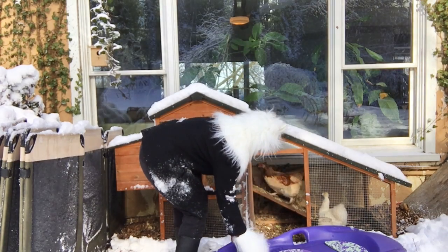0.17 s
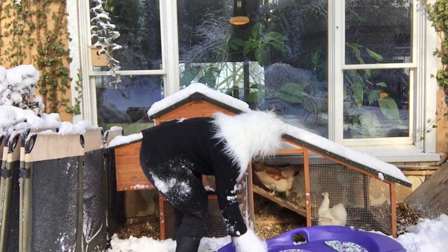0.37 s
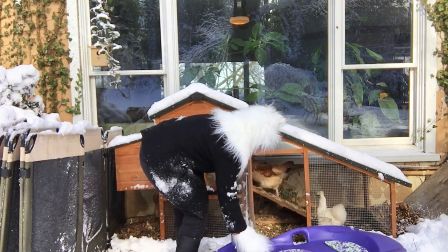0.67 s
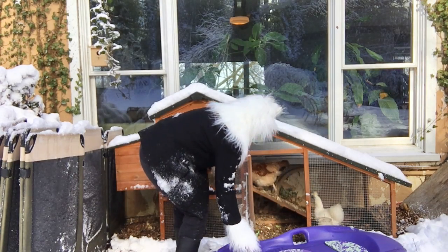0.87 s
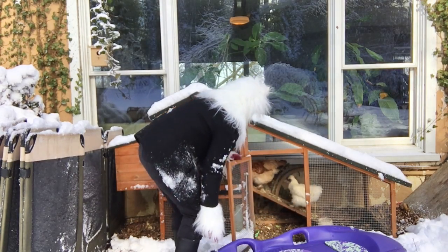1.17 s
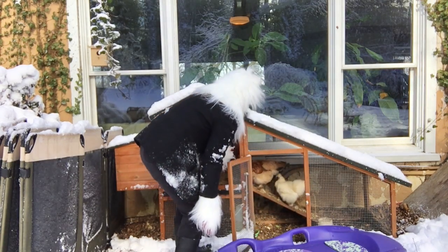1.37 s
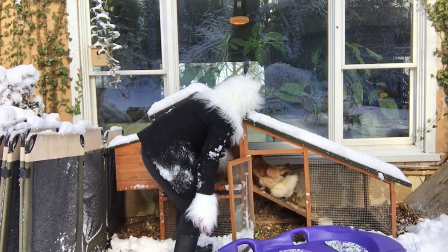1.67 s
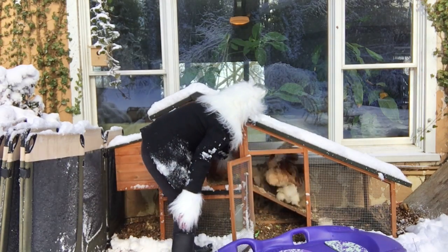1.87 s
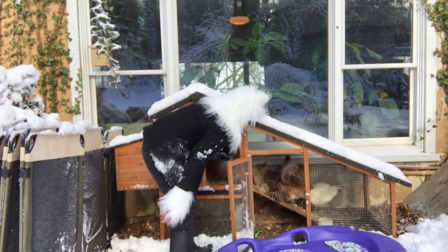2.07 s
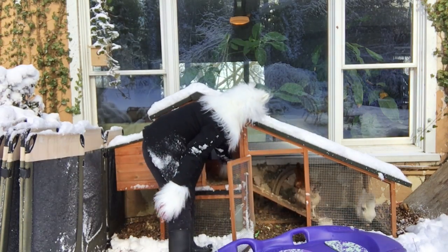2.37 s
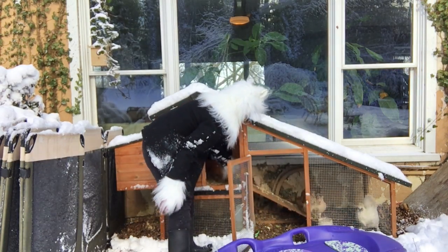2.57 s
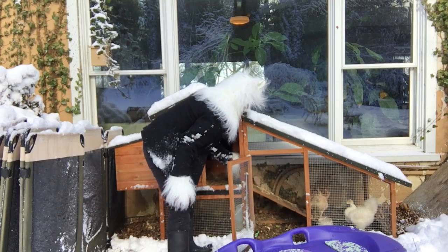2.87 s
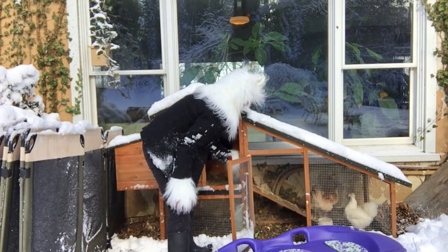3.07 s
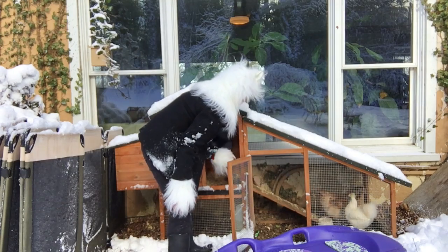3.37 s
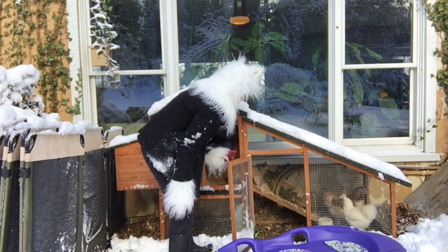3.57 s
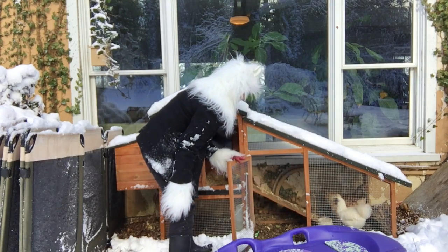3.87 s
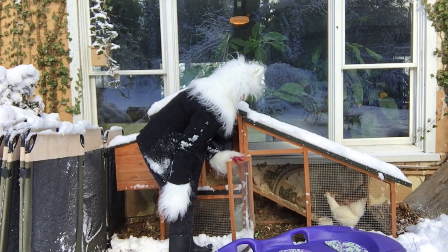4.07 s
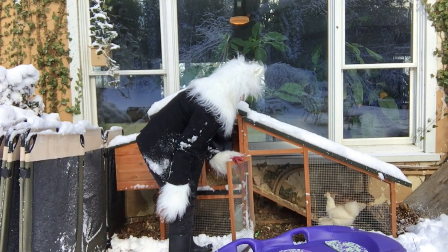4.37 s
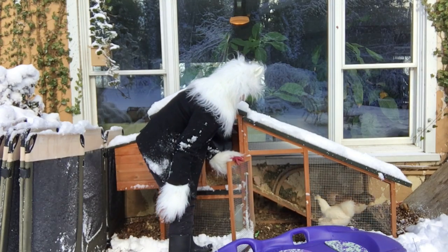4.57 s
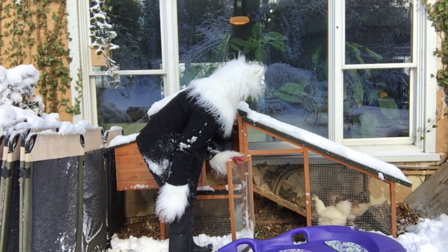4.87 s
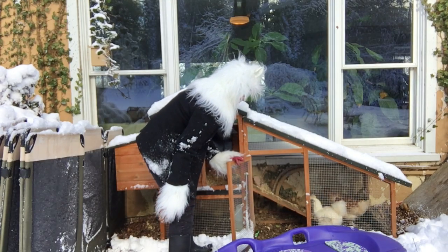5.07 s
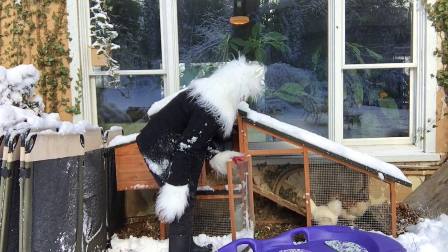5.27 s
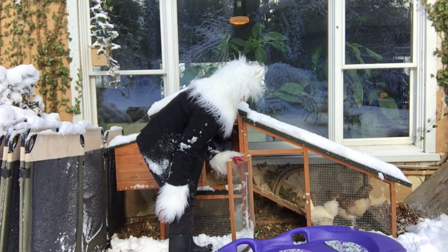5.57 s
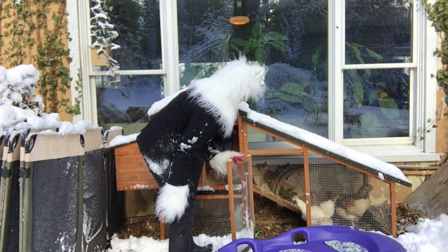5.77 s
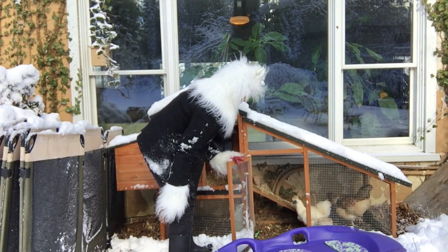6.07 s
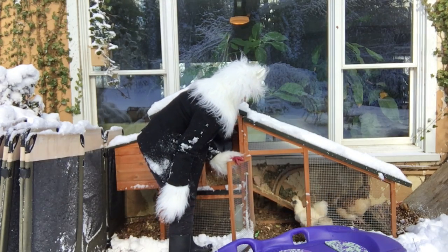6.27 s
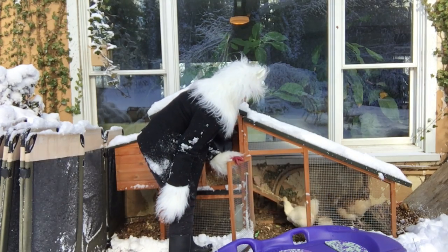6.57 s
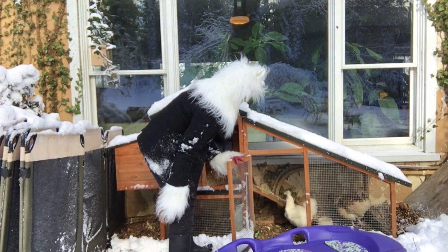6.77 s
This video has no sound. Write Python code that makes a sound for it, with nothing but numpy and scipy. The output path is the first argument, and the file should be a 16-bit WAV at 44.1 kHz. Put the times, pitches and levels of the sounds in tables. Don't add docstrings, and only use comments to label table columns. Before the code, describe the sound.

A winter yard beside a wooden hen coop, heard from nearby, with slow low wind pushes on the microphone and faint hiss. From 0 to 0.7 s, five hollow mitten knocks on a plastic sled, the first strongest, come with latch clicks and rustle; a sharp click lands near 0.6. A low cluck at 0.95 and a hoarse murmur at 1.0-1.4 follow, with a thin peep. Short clucks at 1.5-1.75, bright latch clicks at 1.78, then a very brief shrill squawk cracks between pitches at 1.95-2.1, with light bumps and straw crackle. Clucks at 2.75 and 2.95; wind swells near 2.8 and 3.95. Two small clucks at 3.9, then near quiet. From 5 s come soft clucks and faint peeps; a hoarse drone swells from 5.2 to 6.6, quick chatter peaks around 5.6-6.2, and a lower, fluttering, wheezy growl joins at 6.13, stopping near 6.62. Only wind remains.

```python
import sys
import numpy as np
from scipy import signal
from scipy.fft import rfft, irfft, next_fast_len
from scipy.io import wavfile
from scipy.ndimage import uniform_filter1d, map_coordinates

SR = 44100
rng = np.random.default_rng(int(sys.argv[2]) if len(sys.argv) > 2 else 0)


def int16_out(signal):
    q = np.round(np.clip(np.atleast_2d(signal).T, -1, 1) * 32767)
    wavfile.write(sys.argv[1], SR, q.astype(np.int16))


def convert_level_to_amplitude(level_db):
    exponent = np.asarray(level_db, float) / 20
    return 10 ** exponent


N = 305195


def unit(x):
    return x / np.sqrt(np.mean(x ** 2) + 1e-20)


def along(points, hz):
    f, db = np.transpose(points)
    return np.interp(np.log(hz + 0.1), np.log(f + 0.064), db)


def curves(rows, n):
    s, *columns = np.transpose(rows)
    return [np.interp(n / SR, s, column) for column in columns]


def span(rows):
    return np.arange(round(rows[0][0] * SR), min(N, round(rows[-1][0] * SR)))


def wobble(count, rate):
    knots = rng.standard_normal(4000)
    return map_coordinates(knots, [np.arange(count) * rate / SR], mode="wrap")


def tone_phase(hz):
    return 2 * np.pi * np.cumsum(hz) / SR


def coloured(x, points, ratio=1):
    m = next_fast_len(len(x) + 4096)
    gain = convert_level_to_amplitude(along(points, np.fft.rfftfreq(m, 1 / SR) / ratio))
    cepstrum = irfft(np.log(gain + 1e-6), m)
    cepstrum[1:m // 2] *= 2
    cepstrum[m // 2 + 1:] = 0
    return irfft(rfft(x, m) * np.exp(rfft(cepstrum)), m)[:len(x)]


def noise(count, points):
    return unit(coloured(rng.standard_normal(count), points))


def breathy(pitch_hz, width_hz):
    count = len(pitch_hz)
    spread = wobble(count, width_hz) + 0.8 * wobble(count, 4 * width_hz)
    return spread * np.sin(tone_phase(pitch_hz))


def swell(t, s, hold, db, rise, fall):
    return convert_level_to_amplitude(db - rise * np.clip(s - t, 0, None) - fall * np.clip(t - s - hold, 0, None))


def add(track, s, sound):
    part = track[round(s * SR):][:len(sound)]
    part += sound[:len(part)]


# [t/s, level/dB]
WIND_STRENGTH = [(0, -47), (.1, -59.5), (.8, -64.5), (1.2, -45), (1.75, -52), (2.1, -48), (2.4, -42),
                 (2.68, -36.5), (2.83, -36), (3.0, -49), (3.66, -50), (3.95, -34.5), (4.15, -53),
                 (4.4, -40.5), (4.95, -50.5), (5.2, -45), (5.75, -70), (6.92, -42)]
# [f/Hz, level/dB]
PUSH_COLOUR = [(1, -11), (3, -0.5), (8, -0.5), (16, -22.5), (24, -59.5), (40, -120)]
BUFFET_COLOUR = [(8, -120), (16, 4), (28, 1.5), (45, -11.5), (70, -15.5), (120, -46), (200, -79.5)]
YARD_COLOUR = [(35, -26), (60, -12.5), (170, -16.5), (450, -20.5), (620, -21.5), (1000, -25.5), (1400, -31),
               (3500, -43.5), (7000, -47), (8300, -43), (9500, -50), (15000, -49.5), (16500, -63.5)]


def weather():
    strength_db = curves(WIND_STRENGTH, np.arange(N))[0]
    swing_db = strength_db - strength_db.mean()
    fade_out = np.clip((N - np.arange(N)) / (SR / 8), 0, 1)
    push = fade_out * convert_level_to_amplitude(-28.5 + 0.58 * swing_db) * noise(N, PUSH_COLOUR)
    buffet = convert_level_to_amplitude(strength_db + 2 + 2.6 * wobble(N, 15.0)) * noise(N, BUFFET_COLOUR)
    flurry = swell(np.arange(N) / SR, s=1.967, hold=0, db=-46, rise=88, fall=22)
    yard = np.hypot(convert_level_to_amplitude(-57.5), flurry) * convert_level_to_amplitude(0.75 * wobble(N, 13.0)) * noise(N, YARD_COLOUR)
    return push + buffet + yard


# [t/s, hold/s, level/dB, dull share level/dB]
MOVES = [(0, 0.056, -61, -3), (0.036, 2.84, -71, 1.5), (0.101, 0.09, -57.5, 5), (0.19, 0.021, -53.5, -15),
         (0.31, .005, -64, -5), (0.596, 0.074, -44, 8.5), (0.689, 0.056, -54, 11), (0.748, 0.027, -60, -5),
         (1.184, 0.26, -63, 0), (1.396, 0.18, -61, 7), (1.435, 0.0067, -58.5, -6), (1.5, .006, -60, 0),
         (1.534, 0.014, -60, 4), (1.712, 0.082, -59, -3), (1.751, .012, -50.5, -5),
         (1.798, 0.012, -42.5, 14), (1.94, 0.6, -58.5, 1), (2.171, 0.011, -46.5, -5),
         (2.196, 0.012, -48, -7), (2.237, .01, -51.5, -7), (2.254, .015, -55, 15), (2.286, .015, -52, -5),
         (2.328, .01, -54, -9), (2.403, .006, -52, -5), (2.43, .004, -49, 0), (2.43, 0.0073, -40.5, 3),
         (2.503, .004, -60, -9), (2.751, 0.015, -60.5, -11), (2.798, .018, -58.5, -7),
         (2.828, .012, -70, -4), (3.03, .012, -61, 15), (3.051, 0.0092, -72, 0), (3.18, 0.0057, -68, 0),
         (3.196, .008, -61, -5), (3.215, .01, -60.5, -8), (3.229, 0.013, -59, -2), (3.303, .006, -65, 18),
         (3.326, 0.009, -67.5, -8), (3.506, 0.0035, -70, -5), (3.553, .004, -67.5, -5)]
# [f/Hz, level/dB]
STRAW_COLOUR = [(180, -28.5), (300, 0.5), (456, -19), (1430, -3), (1600, -1), (3140, -7), (5830, -11),
                (13000, -20.5), (15700, -20.5), (16500, -52)]
WOOD_COLOUR = [(300, -30.5), (700, -3.5), (1200, -0.5), (1800, -5), (2500, -7.5), (3300, -15.5),
               (5000, -45.5)]


def rustle():
    t = np.arange(N) / SR
    moves = [swell(t, s, hold, db, rise=880, fall=710) for s, hold, db, _ in MOVES]
    crisp = np.sqrt(sum(move ** 2 for move in moves))
    dull = np.sqrt(sum((move * convert_level_to_amplitude(row[-1])) ** 2 for move, row in zip(moves, MOVES)))
    grains = rng.standard_normal(N) * convert_level_to_amplitude(2.7 * wobble(N, 330) + 1.3 * wobble(N, 45))
    straw = crisp * unit(coloured(grains, STRAW_COLOUR))
    return straw + convert_level_to_amplitude(-10.5) * dull * unit(coloured(grains, WOOD_COLOUR, 0.64))


# [t/s, peak level/dB, woody part level/dB, t60/s]
LATCH_CLICKS = [(0.0074, -37, 11.5, 0.13), (0.103, -41, 9.5, 0.052), (0.1433, -20, -9, 0.081),
                (0.1922, -30.5, 12.5, 0.03), (0.3598, -40.5, 10, 0.097), (0.524, -48, 4, 0.025),
                (0.5476, -39.5, 3, .03), (0.5528, -30.5, 6.5, 0.016), (0.5923, -12.5, -6.5, 0.042),
                (0.6405, -28, 6.5, 0.1), (0.694, -32, -6, 0.11), (1.0208, -46, 16.5, 0.065),
                (1.106, -47.5, 4, 0.11), (1.191, -34.5, -4, 0.065), (1.29, -46, 3, 0.092),
                (1.456, -58, -25, 0.025), (1.5901, -36.5, 1.5, 0.12), (1.768, -40.5, 12, 0.057),
                (1.7757, -22, -7, 0.25), (1.7787, -12.5, -3.5, 0.14), (1.8015, -27, -9, .05),
                (1.7934, -24, 4, 0.074), (1.814, -31, -1, 0.034), (1.8911, -21.5, -3, 0.13),
                (1.93, -46.5, 23, 0.015), (2.105, -23, -3, 0.058), (2.114, -22, 2, 0.12),
                (2.3535, -25.5, 8.5, 0.11), (2.4666, -31.5, 2.5, 0.13), (2.993, -45.5, 18.5, 0.082),
                (3.018, -56, 17, 0.22), (3.085, -51.5, 6, 0.045), (3.8655, -59, 8, 0.031),
                (4.6835, -63.5, 0.5, 0.039)]
# [f/Hz, level/dB]
WIRE_COLOUR = [(1470, -34.5), (2500, 4.5), (2750, -3), (6600, -7.5), (7490, -5), (10000, -16.5),
               (13200, -15), (15700, -22.5), (16500, -37)]
EDGE_COLOUR = [(3000, -45), (6500, -9), (8200, 9.5), (10000, -5.5), (13000, -0.5), (16500, -25.5)]


def clicks():
    track, t = np.zeros(N), np.arange(SR // 8) / SR
    for s, db, wood_db, life in LATCH_CLICKS:
        tick = convert_level_to_amplitude(-60 * t / 0.023)
        ring = convert_level_to_amplitude(-9.5 - 60 * t / max(life, 0.005))
        fall = (tick + ring) * (1 - np.exp(-t / 0.0003))
        body = noise(len(t), WIRE_COLOUR) + convert_level_to_amplitude(wood_db) * noise(len(t), WOOD_COLOUR)
        edge = convert_level_to_amplitude(-1.5 - wood_db - 60 * t / 0.0095) * noise(len(t), EDGE_COLOUR)
        add(track, s, convert_level_to_amplitude(db - 9.0) * (fall * body + edge))
    return track


# [t/s, peak level/dB, slap level/dB, pitch ratio]
BLOWS = [
    (.007, -9.5, -9.5, 1.14),
    (0.19, -12, -11.5, 1.01),
    (0.359, -18, -7, 0.9),
    (0.548, -17.5, -7, 0.99),
    (0.708, -20.5, -8, 1.07),
    (1.203, -36, -3.5, 1.6),
    (1.811, -35.5, 3.5, 1.7),
    (2.09, -31.5, 5, 1.2),
    (2.114, -28.5, -0.5, 2.2),
]
# [f/Hz, level/dB, t60/s]
SHELL_MODES = [(93, -11.5, 0.18), (132, -7, 0.14), (170.6, -3, 0.12), (204.8, -8, 0.12), (274, -9.5, 0.07),
               (378, -9, 0.09), (600, -22.5, 0.088), (780, -21.5, 0.09), (920, -16, 0.066),
               (1238, -28, 0.073), (1610, -31, 0.089)]


def knocks():
    track, t = np.zeros(N), np.arange(SR // 4) / SR
    slap_colour = [(150, -3.5), (300, -1.5), (600, -3), (1400, -12.5), (2200, -33.0), (5000, -43.0)]
    for s, db, slap_db, ratio in BLOWS:
        ring = np.zeros(len(t))
        for k, (hz, level, life) in enumerate(SHELL_MODES):
            fall = convert_level_to_amplitude(level + 1.5 * rng.normal() - 60 * t / life)
            ring += (-1) ** k * fall * np.sin(2 * np.pi * hz * ratio * t)
        bloom = convert_level_to_amplitude(1.0) * (1 - np.exp(-t / 0.015))
        slap = convert_level_to_amplitude(slap_db - 1.0 - 60 * t / 0.11) * noise(len(t), slap_colour)
        add(track, s, convert_level_to_amplitude(db) * (1 - np.exp(-t / 0.0013)) * (bloom * ring + slap))
    return track


# [t/s, length/s, f/Hz, level/dB, octave level/dB]
PULLET_PEEPS = [
    (1.247, 0.072, 2790, -65, -14),
    (1.332, 0.066, 3800, -86, -20),
    (5.112, 0.025, 3200, -77, -24),
    (5.497, 0.088, 3370, -70, -1),
    (5.545, 0.068, 2740, -68, 1),
    (5.74, 0.074, 2810, -70, 5.5),
    (5.82, .06, 2850, -81.5, 1),
]


def peeps():
    track = np.zeros(N)
    for s, length, start_hz, db, octave_db in PULLET_PEEPS:
        u = np.linspace(0, 1, round(length * SR))
        pitch_hz = start_hz * (1 + 0.018 * u)
        whistle = breathy(pitch_hz, 113.0) + convert_level_to_amplitude(octave_db) * breathy(2 * pitch_hz, 322)
        add(track, s, convert_level_to_amplitude(db) * np.sin(np.pi * u) ** 0.2 * whistle)
    return track


def syrinx(pitch_hz, rough, throat, ratio, halves=0):
    count = len(pitch_hz)
    phase = tone_phase(pitch_hz * (1 + (0.013 + 0.0373 * rough) * wobble(count, 260)))
    puffs = sum(np.cos(k * phase) for k in range(1, 26))
    puffs = puffs * (1 + halves * np.cos(phase / 2))
    air = (1 + np.cos(phase)) ** 2 * rng.standard_normal(count)
    share = np.clip(rough, 0, 1) ** 2
    source = np.sqrt(1 - share) * unit(puffs) + np.sqrt(share) * unit(air)
    return unit(coloured(source, throat, ratio))


# [f/Hz, level/dB]
HEN_THROAT = [(250, -22.5), (550, -5.5), (800, -3), (1060, 5.5), (1300, -13), (1500, -18), (1800, -18),
              (2250, -42), (2800, -26), (3300, -33.5), (3650, -25.5), (4150, -36.5), (4600, -49),
              (8000, -43.5), (8700, -34), (10000, -97.5)]
# [t/s, length/s, f/Hz, level/dB, throat ratio]
STARTLED = [
    (0.945, 0.065, 414.6, -51.5, 1.05),
    (1.529, 0.038, 364.5, -44.5, 1.26),
    (1.697, 0.029, 381.5, -42.5, 0.95),
    (1.748, 0.024, 810, -56, 2.3),
    (2.742, 0.0253, 335.4, -41, 1.09),
    (2.947, 0.0273, 364.6, -39, 1.08),
    (3.862, 0.02, 346, -48, 1.065),
    (4.975, 0.057, 292, -48, 1.08),
    (5.114, 0.066, 345, -49.5, .9),
]
CHATTERING = [
    (3.914, 0.037, 425, -46.5, 0.93),
    (5.279, 0.038, 421, -46, 0.84),
    (5.62, 0.037, 416.6, -39.5, 1.03),
    (5.701, 0.05, 413, -37.5, 1.02),
    (5.787, 0.012, 401, -43, 0.89),
    (5.816, 0.029, 411, -41, 1.01),
    (5.962, 0.036, 433.5, -36.5, 1.07),
    (6.025, 0.024, 433, -40.5, 1.1),
    (6.057, 0.093, 445, -39, 1.08),
    (6.189, 0.03, 340, -36.5, 0.89),
]
STARTLED_GLIDES = [0.022, 0.083, -0.13, .05, -0.14, 0.26, 0.047, 0.054, -0.048]


def clucks():
    track = np.zeros(N)
    open_throat = [(hz, 0.77 * db if hz < 2500 else db) for hz, db in HEN_THROAT]
    startled = (STARTLED, STARTLED_GLIDES, 0.52, open_throat)
    chatter = (CHATTERING, np.zeros(len(CHATTERING)), 0.36, HEN_THROAT)
    for rows, glides, rough, throat in (startled, chatter):
        for (s, length, pitch_hz, db, ratio), glide in zip(rows, glides):
            u = np.linspace(0, 1, round(length * SR))
            arch_hz = pitch_hz * (1 + 0.05 * (np.sin(2.9 * u) - 0.7) + glide * (u - 0.5))
            shifted = sorted((hz * ratio if hz < 2000 else hz, level) for hz, level in throat)
            hum = convert_level_to_amplitude(-9) * np.sin(tone_phase(arch_hz))
            voice = syrinx(arch_hz, rough, shifted, 0.99) + hum
            shape = np.clip(u / 0.12, 0, 1) * np.clip((1 - u) / 0.25, 0, 1)
            rattle = convert_level_to_amplitude(2.5 * wobble(len(u), 152))
            add(track, s, convert_level_to_amplitude(db) * shape * rattle * voice)
    return track


def between_clucks(depth_db):
    t = np.arange(N) / SR
    busy = sum((t > s) * (t < s + length) * 1. for s, length, *_ in CHATTERING)
    return convert_level_to_amplitude(depth_db * uniform_filter1d(busy, size=300))


def call(rows, manner, throat, ratio, depth_db, halves=0):
    n = span(rows)
    count = len(n)
    pitch_hz, level_db, hum_db = curves(rows, n)
    rough, rough_end, first, last, uneven = manner
    flutter = np.sin(tone_phase(np.linspace(first, last, count) * (1 + uneven * wobble(count, 29.3))))
    voice = syrinx(pitch_hz, np.linspace(rough, rough_end, count), throat, ratio, halves)
    voice = unit(voice * convert_level_to_amplitude(depth_db * np.minimum(flutter, 0.4) + 0.94 * wobble(count, 32.8)))
    hum = np.sin(tone_phase(pitch_hz + 6 * wobble(count, 41.8)))
    track = np.zeros(N)
    track[n] = convert_level_to_amplitude(level_db) * (voice + convert_level_to_amplitude(hum_db) * hum) * signal.windows.tukey(count, 600 / count)
    return track


# [t/s, f/Hz, level/dB, hum level/dB]
MURMUR_PATH = [
    (1.0, 405, -54, -30),
    (1.2, 401, -56, -30),
    (1.32, 414, -47, -29),
    (1.44, 399, -56.5, -35),
]
# [roughness at start, at end, flutter f/Hz at start, at end, unevenness 0-1]
MURMUR_MANNER = (.88, .88, 40, 41, .3)
# [f/Hz, level/dB]
MURMUR_THROAT = [(250, -20), (550, 4), (800, 3.5), (1100, -0.5), (1500, -14.5), (2000, -15), (2750, -22),
                 (3300, -35), (5000, -56)]


def murmur():
    return call(MURMUR_PATH, MURMUR_MANNER, MURMUR_THROAT, 1, 4)


# [t/s, f/Hz, level/dB, hum level/dB]
DRONE_PATH = [
    (5.18, 500, -51.5, -25),
    (5.4, 502.4, -48.5, -25),
    (5.48, 522.4, -49, 1.5),
    (5.7, 524, -40.5, -13.5),
    (5.9, 537.8, -41, -3),
    (6.15, 542.6, -33.5, -25),
    (6.18, 545, -47, -19),
    (6.24, 532.2, -38, -14),
    (6.62, 519.6, -42, -23),
]
# [roughness at start, at end, flutter f/Hz at start, at end, unevenness 0-1]
DRONE_MANNER = (.92, .72, 62, 118, .08)


def drone():
    return call(DRONE_PATH, DRONE_MANNER, HEN_THROAT, 1.01, 6) * between_clucks(-8)


# [t/s, f/Hz, level/dB, hum level/dB]
GROWL_PATH = [
    (6.13, 337, -45.5, -5),
    (6.234, 338.4, -43.5, -29),
    (6.243, 337.6, -36.5, -17),
    (6.45, 343.5, -33.5, -21),
    (6.6, 338.2, -34, -22),
    (6.622, 330, -41, -20),
]
# [roughness at start, at end, flutter f/Hz at start, at end, unevenness 0-1]
GROWL_MANNER = (.42, .45, 111.5, 114.5, .02)
# [f/Hz, level/dB]
GROWL_GAPE = [(250, -55.5), (600, -12.5), (820, -4), (1050, 2.5), (1200, 2.5), (1350, -22), (1540, -9.5),
              (1800, -17.5), (2150, -38), (2500, -23), (3050, -24), (3800, -26), (4200, -41), (5200, -100)]


def growl():
    return call(GROWL_PATH, GROWL_MANNER, GROWL_GAPE, 1.01, 6, halves=0.45)


# [f/Hz, width f/Hz, level/dB, downward glide share, growth level/dB]
NOSTRIL_TONES = [(2770, 150, -16.5, -0.028, 5.5), (3166, 97, -20, -0.0015, 8),
                 (5100, 200, -30.5, 0.041, -6), (6530, 460, -31.5, 0.071, 0), (8350, 440, -37.5, 0.054, 7),
                 (9740, 1000, -44.5, 0.0096, 5.5), (13340, 1400, -44.5, -.04, 3.5),
                 (14800, 1200, -57, .01, 7)]


def wheeze():
    n = span(GROWL_PATH)
    count = len(n)
    u = np.linspace(0, 1, count)
    stretch = np.sin(2.6 * u ** 1.9)
    growl_db = curves(GROWL_PATH, n)[1]
    track = np.zeros(N)
    for hz, width_hz, db, sag, growth_db in NOSTRIL_TONES:
        phase = tone_phase(hz * (1 - sag * stretch) + width_hz * wobble(count, 1500))
        track[n] += convert_level_to_amplitude(growl_db + db + growth_db * u + 3.6 * wobble(count, 228)) * np.sin(phase)
    gasp = swell(n / SR, s=6.603, hold=0.018, db=-63, rise=400, fall=900)
    track[n] += gasp * noise(count, [(3000, -34), (4200, 6), (5600, 0), (6500, -9), (9000, -23)])
    track[n] *= np.clip((u - 0.17) / 0.06, 0.15, 1) * signal.windows.tukey(count, 0.03)
    return track


# [t/s, start f/Hz, end f/Hz, strongest line level/dB, octave-below level/dB]
REGISTERS = [
    (1.948, 1600, 1800, -36, -28),
    (1.976, 1800, 1780, -18, -24),
    (1.988, 2050, 2000, -28, -27),
    (1.997, 1750, 1730, -12, -23),
    (2.012, 1740, 1800, -21, -23),
    (2.027, 1330, 1260, -11, -38),
    (2.043, 1850, 1800, -19, -28),
    (2.052, 1400, 1450, -21, -31),
    (2.058, 1600, 1290, -15, -32),
    (2.08, 1320, 1250, -36, -50),
]
# [t/s, level/dB]
RASP_LEVEL = [(1.945, -74.5), (1.965, -43), (1.98, -30), (2.03, -29), (2.07, -32), (2.088, -41), (2.1, -47)]
# [f/Hz, level/dB]
BEAK_COLOUR = [(500, -43.5), (860, -17), (1300, -11), (1800, -14.5), (2300, -11), (3200, -19.5),
               (3900, -17), (4200, -29.5), (4650, -12), (5200, -24), (6200, -29), (8300, -19),
               (9500, -31.5), (16500, -39)]


def squawk():
    track = np.zeros(N)
    n = span(RASP_LEVEL)
    rasp_db = curves(RASP_LEVEL, n)[0]
    track[n] = convert_level_to_amplitude(rasp_db + 0.5 + 2.5 * wobble(len(n), 219.3)) * noise(len(n), BEAK_COLOUR)
    track[n] += convert_level_to_amplitude(rasp_db - 10) * breathy(np.interp(n / SR, [1.98, 2.04], [3900, 4700]), 260)

    stops = [row[0] for row in REGISTERS[1:]] + [2.092]
    path = []
    for (s, start_hz, end_hz, db, low_db), stop in zip(REGISTERS, stops):
        path.append((s + 0.003, start_hz, db, low_db))
        path.append((stop - 0.001, end_hz, db - 3.5, low_db))
    path.sort()
    n = span(path)
    count = len(n)
    pitch_hz, line_db, low_db = curves(path, n)
    phase = tone_phase(pitch_hz + 20 * wobble(count, 300))
    line = np.sin(phase) + convert_level_to_amplitude(-24) * np.sin(2 * phase) + convert_level_to_amplitude(-22.0) * np.sin(3 * phase)
    low = np.sin(phase / 2) + convert_level_to_amplitude(-12.5) * np.sin(3 * phase / 2) + convert_level_to_amplitude(-20.5) * np.sin(5 * phase / 2)
    lines = convert_level_to_amplitude(line_db + 0.62 * wobble(count, 250)) * line
    lines += convert_level_to_amplitude(low_db + 1.1 * wobble(count, 200)) * low
    track[n] += lines * signal.windows.tukey(count, 0.08)
    return track


# [delay t/s, level/dB]
BOARD_ECHOES = [(.0021, -28.5), (.0047, -26.5), (.0083, -18), (.0131, -16), (.019, -38.5)]


def coop(x):
    t = np.arange(SR // 5) / SR
    tail = convert_level_to_amplitude(-60 * t / 0.071) * noise(len(t), WOOD_COLOUR)
    out = x + convert_level_to_amplitude(-18) * signal.fftconvolve(x, tail / np.linalg.norm(tail))[:N]
    for k, (s, db) in enumerate(BOARD_ECHOES):
        out += convert_level_to_amplitude(db) * (-1) ** k * np.pad(x, (round(s * SR), 0))[:N]
    return out


def scene():
    long_calls = murmur() + drone() + growl() + wheeze()
    inside = coop(peeps() + clucks() + long_calls + squawk())
    outside = weather() + rustle() + clicks() + knocks()
    return (inside + outside)[None]


def band_limit(x):
    return signal.sosfilt(signal.butter(12, 16430, fs=SR, output="sos"), x)


def record(dry):
    edge = signal.butter(12, 15900, fs=SR, output="sos")
    return band_limit(signal.sosfilt(edge, dry))


dry = scene()
out = record(dry)
int16_out(out)
```